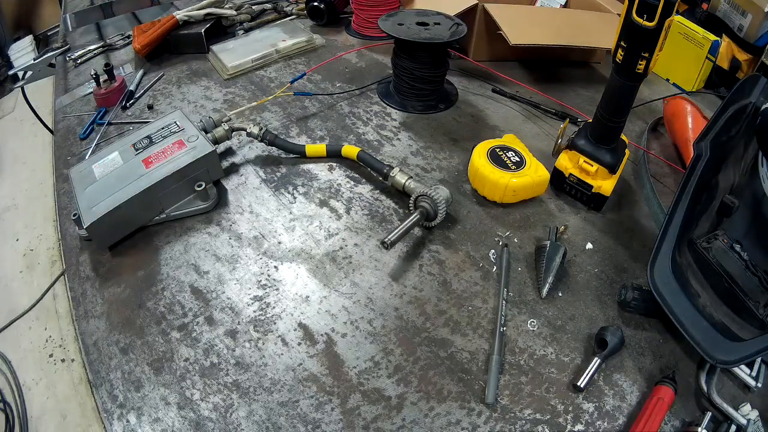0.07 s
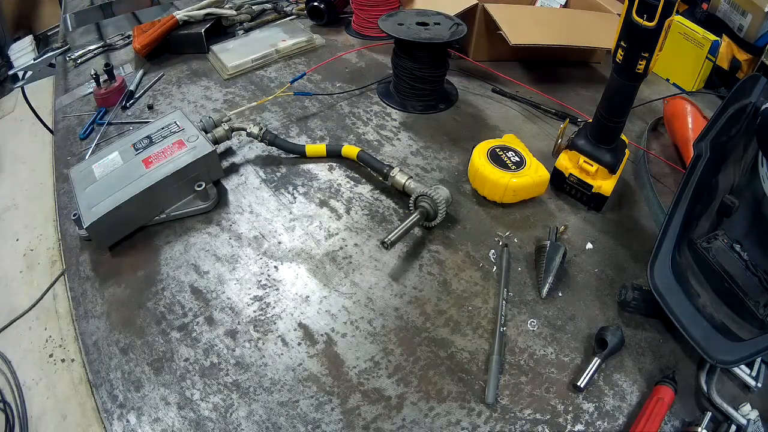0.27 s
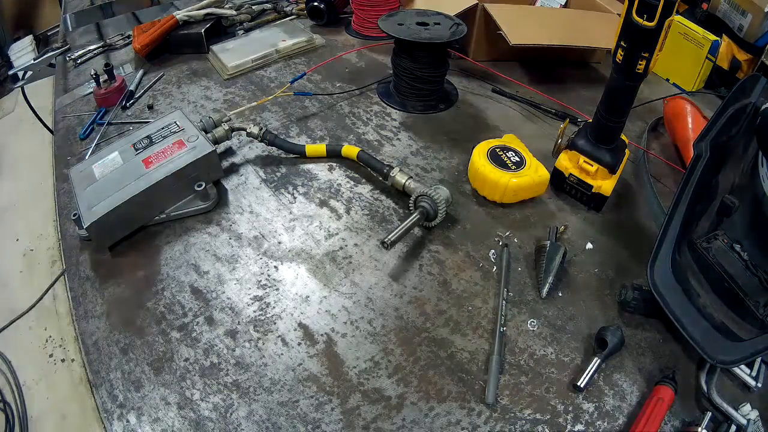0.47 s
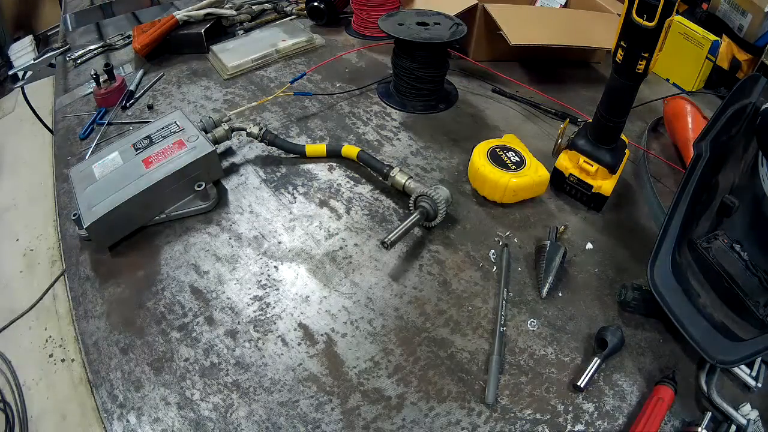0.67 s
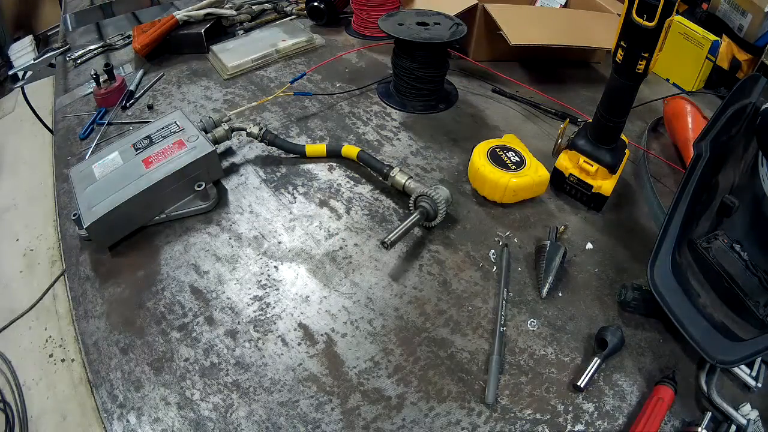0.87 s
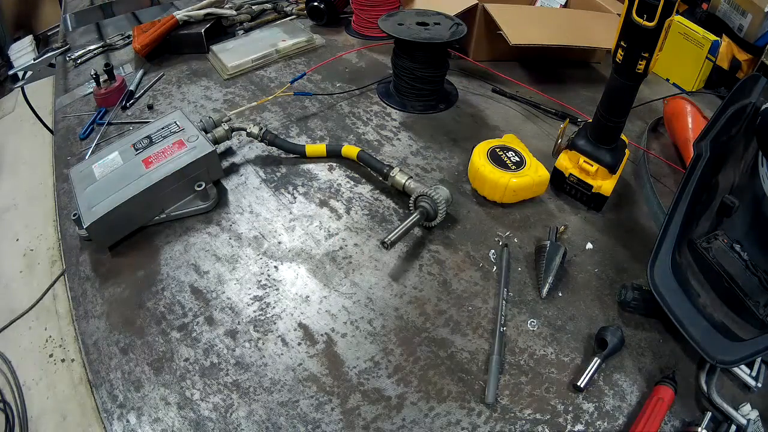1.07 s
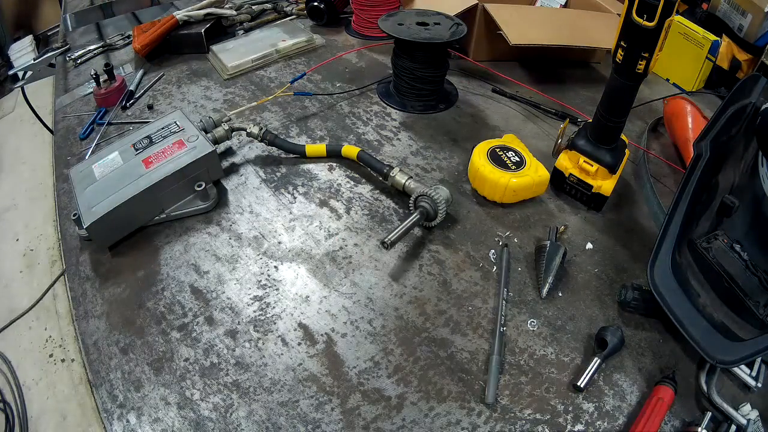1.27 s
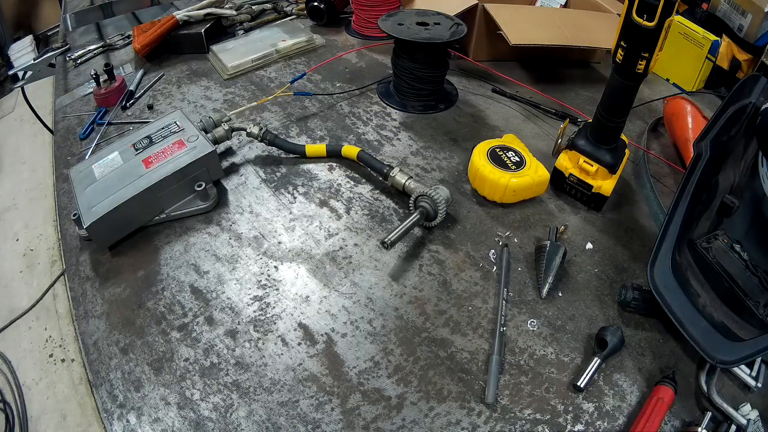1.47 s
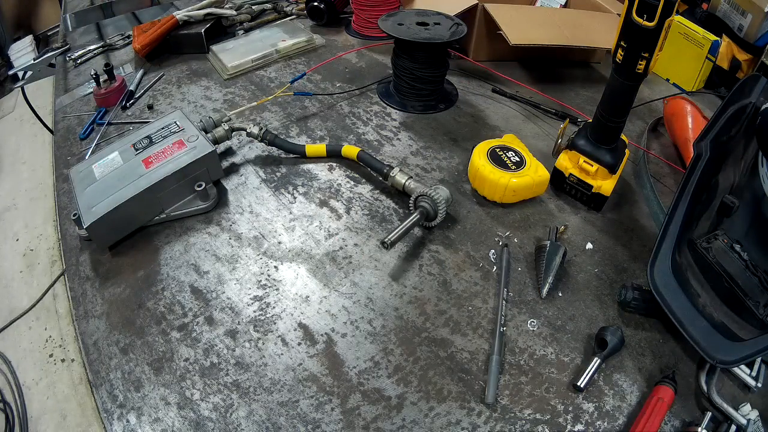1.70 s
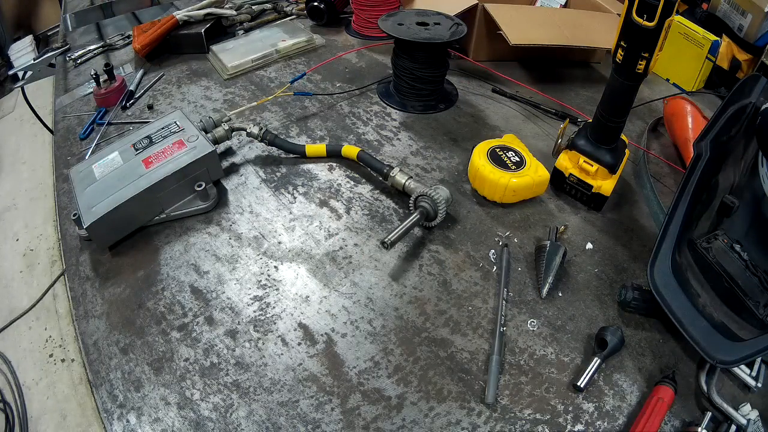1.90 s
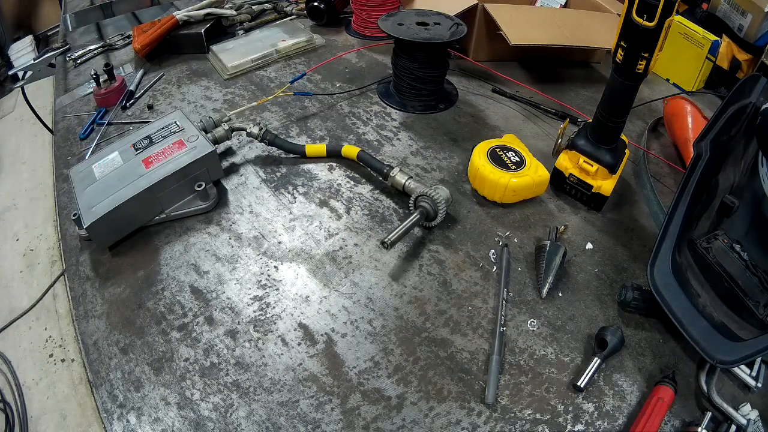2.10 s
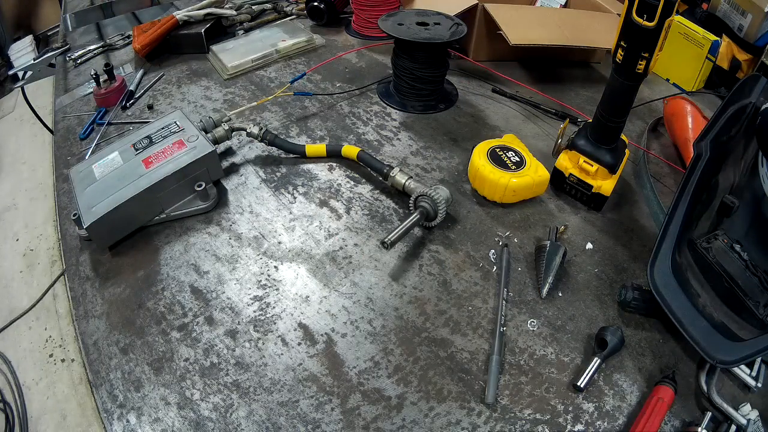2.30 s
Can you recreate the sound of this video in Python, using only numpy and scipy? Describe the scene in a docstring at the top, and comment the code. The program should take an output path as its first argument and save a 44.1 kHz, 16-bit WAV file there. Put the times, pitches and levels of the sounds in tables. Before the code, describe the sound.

In a quiet workshop, a single electric spark cracks from an igniter plug right by the microphone, briefly overloading it. A short, bright reverberation follows and dies away into low room hiss.

```python
"""Over quiet room noise, the faint reverberation of an earlier sound dies away in a workshop.
An igniter plug fires once on a cluttered steel bench, close to the microphone. Its blast wave overloads
the input, is coloured by a close reflection off the bench, echoes from near surfaces and fills the room.
The gain control ducks, then recovers, which holds the reverberation up for a moment.
Much later something settles with a faint tick."""
import sys
import numpy as np
from scipy import signal
from scipy.fft import rfft, irfft
from scipy.io import wavfile

SR = 44100
rng = np.random.default_rng(int(sys.argv[2]) if len(sys.argv) > 2 else 0)


def transcribe(u):
    """Save the signal u as a 16-bit wav file named by the first command-line argument.

    u: samples, shape (n,) or (channels, n), limited to [-1, 1]; the rate is SR.
    q: integer samples, one column per channel.
    """
    v = np.clip(np.atleast_2d(u).T, -1, 1)
    q = np.round(v * 32767).astype(np.int16)
    wavfile.write(sys.argv[1], SR, q)


N = 108045
TIME = np.arange(N) / SR
BIN_HZ = np.arange(N // 2 + 1) * SR / N
SPARK_S = .197262


def from_db(db):
    """Amplitude ratio: a factor of ten for every 20 dB."""
    return 10 ** (np.asarray(db) / 20)


def at_hz(points, hz):
    """Interpolation of a table on a logarithmic frequency axis."""
    f, value = np.transpose(points)
    return np.interp(np.log(np.maximum(hz, 1)), np.log(f), value)


def step(s):
    """Unit step at time s, one sample wide."""
    return np.clip((TIME - s) * SR, 0, 1)


def decay(s, t60):
    """Exponential decay from time s, falling 60 dB in t60."""
    return step(s) * from_db(-60 * np.clip((TIME - s) / t60, 0, 5))


def low_pass(x, hz):
    """Second-order low-pass: a gentle loss of treble."""
    return signal.sosfilt(signal.butter(2, min(hz, .45 * SR), fs=SR, output="sos"), x + 1e-18)


def noise(spectrum):
    """Spectral shaping: white noise becomes coloured noise of rms 1."""
    white = rfft(rng.standard_normal(N))
    coloured = irfft(white * from_db(at_hz(spectrum, BIN_HZ)), N)
    return coloured / coloured.std()


def damped_tones(s, tones):
    """Superposition of damped sinusoids that start at time s."""
    return sum(from_db(db) * decay(s, t60) * np.sin(2 * np.pi * hz * (TIME - s)) for hz, db, t60 in tones)


# Spectral density of room noise with microphone hiss, and of low rumble: f/Hz, relative level/dB
FLOOR_SPECTRUM = [(12, -27), (20, 0), (74, -1.5), (101, -0.5), (122, -3), (161, -2), (232, -5), (352, -7.5),
                  (382, -8), (767, -15.5), (4550, -22.5), (13900, -20.5), (15500, -23)]
RUMBLE_SPECTRUM = [(20, 0), (50, 0), (110, -12), (250, -40), (1000, -80)]
# Swells of the rumble: centre t/s, half-width t/s, level/dB
RUMBLE_SWELLS = [(.085, .025, -64), (.735, .05, -65)]
def room_noise():
    """Amplitude modulation: low rumble swells softly over a steady noise floor."""
    swell = sum(from_db(db) * np.exp(-((TIME - s) / half_s) ** 2) for s, half_s, db in RUMBLE_SWELLS)
    return from_db(-67) * noise(FLOOR_SPECTRUM) + swell * noise(RUMBLE_SPECTRUM)


# Spectral density of the workshop's reverberation: f/Hz, relative level/dB
REVERB_SPECTRUM = [(100, -18.5), (250, -13), (370, -11.5), (560, -6), (1050, -2.5), (1380, 1), (1600, -3),
                   (2450, -5.5), (3100, -11), (3950, -7.5), (5600, -12), (6550, -18.5), (7700, -11),
                   (9300, -19.5), (11200, -15.5), (13000, -27.5), (15000, -28)]
# Reverberation time by band: f/Hz, 60 dB decay t/s
REVERB_TIMES = [(150, 0.5), (500, .5), (1400, .55), (4000, .59), (8000, .505), (12000, .44), (15000, .38)]
def reverberation(s, build_s=.0045):
    """Diffuse field: from time s dense reflections build up, then each band decays at its own rate."""
    spectrum = rfft(noise(REVERB_SPECTRUM))
    centres = [hz for hz, _ in REVERB_TIMES]
    field = np.zeros(N)
    for share, (_, t60) in zip(np.eye(len(centres)), REVERB_TIMES):
        band = at_hz(list(zip(centres, share)), BIN_HZ)  # overlapping triangular weights
        field += irfft(spectrum * band, N) * decay(s, t60)
    build_up = 1 - np.exp(-np.maximum(TIME - s, 0) / build_s)
    return from_db(-17) * field * build_up


def blast(shock_s=.00004, suction_s=.00067, rebound_decay_s=.0017):
    """Blast wave: the spark sends out a thin shock front, a suction, then a dying rebound."""
    shock_end = SPARK_S + shock_s
    suction_end = shock_end + suction_s
    shock = from_db(23) * (step(SPARK_S) - step(shock_end))
    suction = from_db(22.3) * (step(shock_end) - step(suction_end))
    relaxation = np.exp(-np.maximum(TIME - suction_end, 0) / rebound_decay_s)
    rebound = from_db(20) * step(suction_end) * relaxation
    return low_pass(shock - suction + rebound, hz=11200)


# Short damped tones that give the snap the colour of its close reflection off the bench:
# f/Hz, level/dB, 60 dB decay t/s
BENCH_COLOUR = [(770, 5.5, .017), (1270, 4.6, .045), (1790, 7.6, .009), (2490, 9.3, .0061),
                (3310, 7, .0135), (3990, 7.8, .0095), (4695, 4.3, .022), (5520, 13.5, .005),
                (7370, 2, .0098), (7700, 1, .016), (9310, 5.5, .0059), (10920, 9, .005),
                (12190, 8.5, .0062), (13050, 3.5, .007)]
# Spectral density of the scatter from the tools: f/Hz, relative level/dB
SCATTER_SPECTRUM = [(100, -7.5), (500, 3), (1300, 1.5), (2500, -5), (5000, -12), (8000, -11), (12000, -14),
                    (15500, -20)]
def bench_reflection(delay_s=.000735):
    """Colouration and scattering: brief tones stand for the bench's reflection, noise for the tools'."""
    arrival = SPARK_S + delay_s
    scatter = from_db(-2) * decay(arrival, t60=.052) * noise(SCATTER_SPECTRUM)
    return damped_tones(arrival, BENCH_COLOUR) + scatter


# Reflections from near surfaces: delay t/s, level/dB, cutoff f/Hz
REFLECTIONS = [(.0065, 3, 3000), (.0083, 3, 7000), (.0199, 3, 3500), (0.0229, -6, 14000), (.036, -7, 11000)]
def early_reflections(lobe_s=.00022):
    """Specular reflection: each near surface returns a dulled compression and rarefaction."""
    reflected = np.zeros(N)
    for delay, db, cutoff_hz in REFLECTIONS:
        arrival = SPARK_S + delay
        pulse = step(arrival) - 2 * step(arrival + lobe_s) + step(arrival + 2 * lobe_s)
        reflected += from_db(db) * low_pass(pulse, cutoff_hz) / 2
    return reflected


# Modes of a small settling object: f/Hz, relative level/dB, 60 dB decay t/s
TICK_MODES = [(3050, -2, .005), (3700, -1, .005), (4450, 1.5, .011)]
def tick(s=2.3493, rise_s=.0002):
    """Impact excitation: something settles and its modes ring briefly."""
    onset = np.clip((TIME - s) / rise_s, 0, 1)
    return from_db(-60) * damped_tones(s, TICK_MODES) * onset


def scene():
    """Superposition: room noise, earlier reverberation, the spark and the tick add at the microphone."""
    spark = blast() + bench_reflection() + early_reflections() + reverberation(SPARK_S)
    earlier_tail = from_db(-49) * reverberation(0)
    return (room_noise() + earlier_tail + spark + tick())[None]


def record(dry, threshold_db=-9, max_duck_db=22.5, recovery_db_per_s=83, overload=.63):
    """Compression and clipping: the gain ducks at once and recovers steadily; the peak still overloads."""
    level_db = 20 * np.log10(np.abs(dry) + 1e-9)
    excess_db = np.clip(level_db - threshold_db, 0, max_duck_db)
    recovery_db = recovery_db_per_s * TIME
    duck_db = np.maximum.accumulate(excess_db + recovery_db, axis=-1) - recovery_db
    clipped = np.clip(dry * from_db(-duck_db), -overload, overload)
    dulled = low_pass(clipped, hz=13500)
    centred = signal.lfilter(*signal.butter(1, 2.6, "high", fs=SR), dulled)  # blocks the DC offset
    hiss = from_db(-77.5) * rng.standard_normal(N)
    band_limit = signal.ellip(10, .1, 80, 15750, fs=SR, output="sos")
    return signal.sosfilt(band_limit, centred + hiss)


dry = scene()
out = record(dry)
transcribe(out)
```